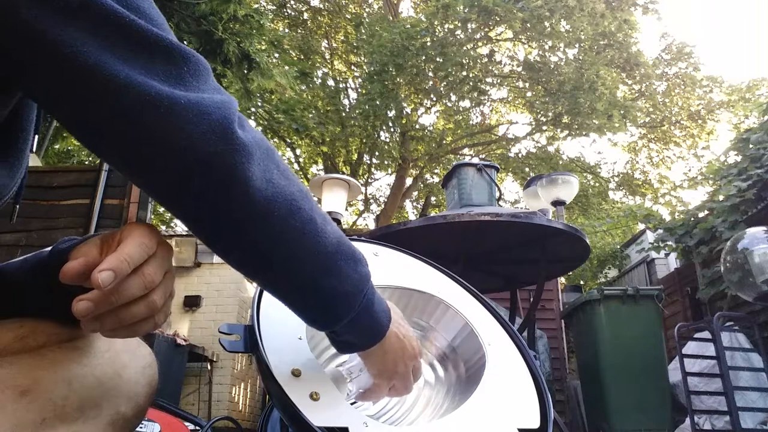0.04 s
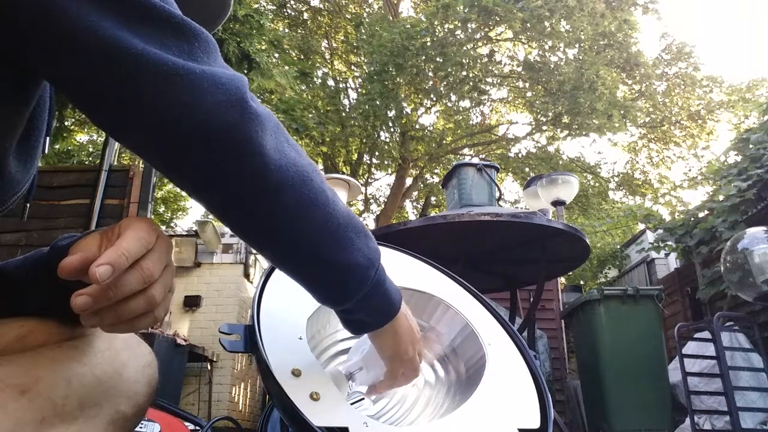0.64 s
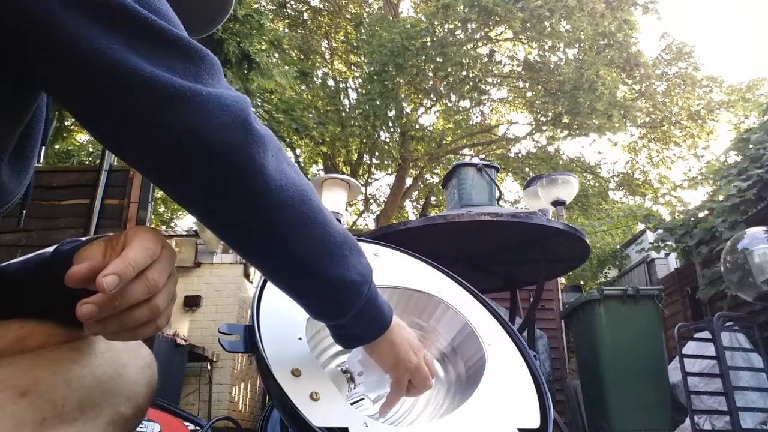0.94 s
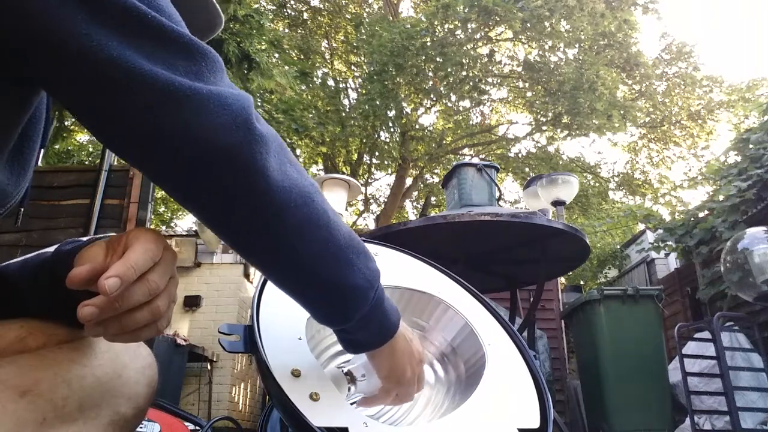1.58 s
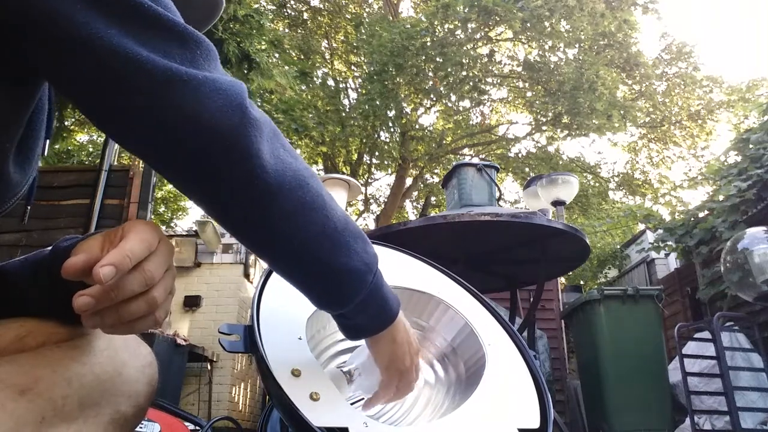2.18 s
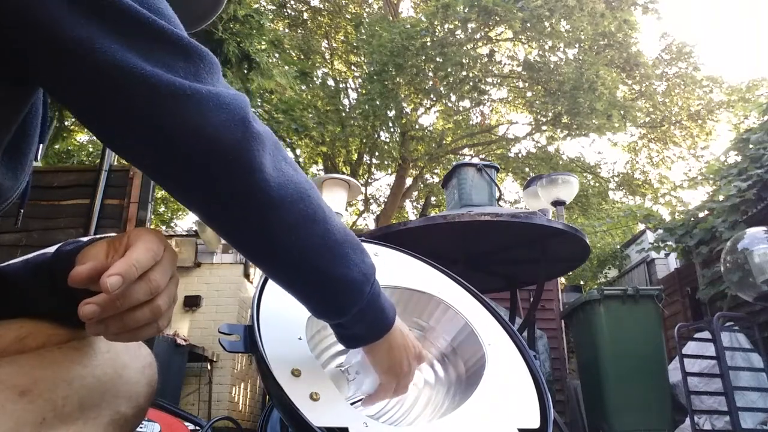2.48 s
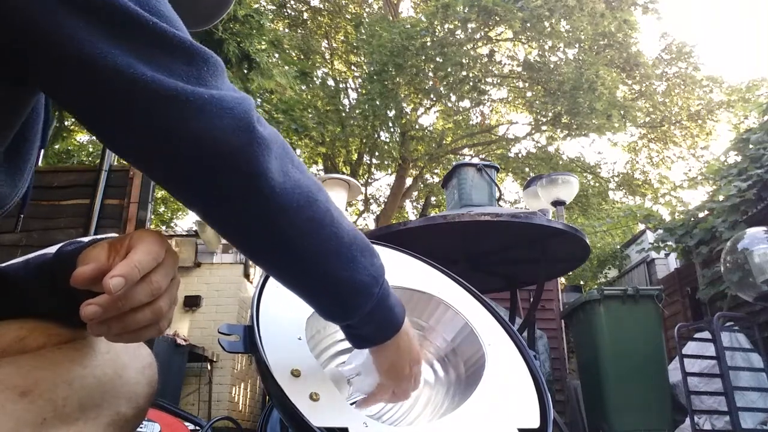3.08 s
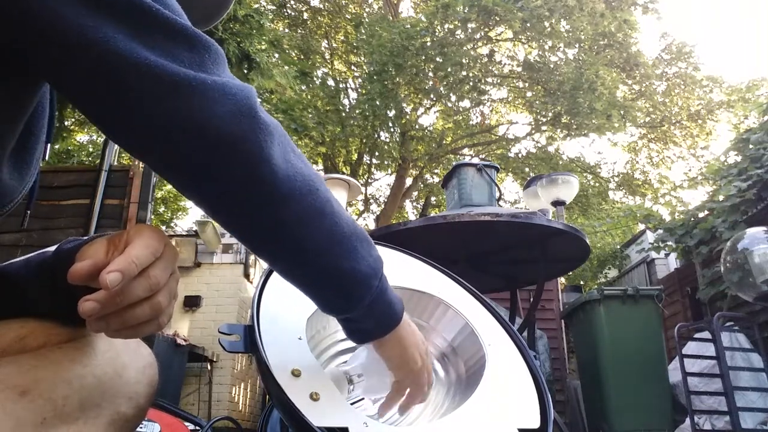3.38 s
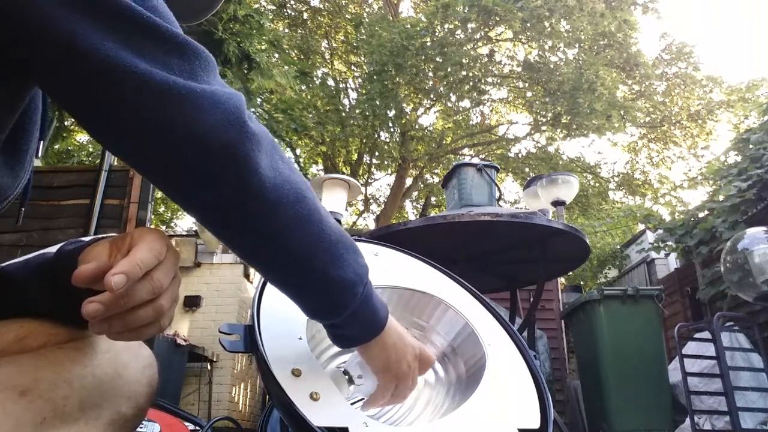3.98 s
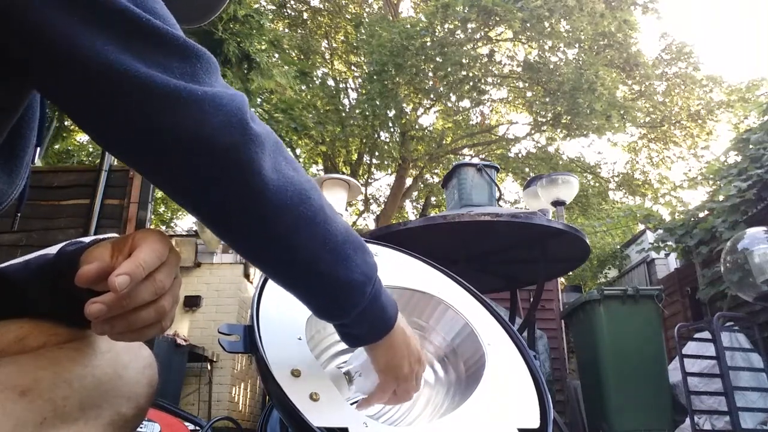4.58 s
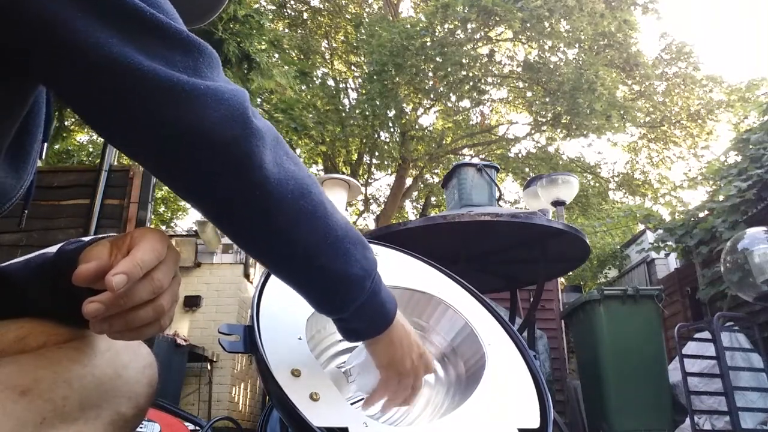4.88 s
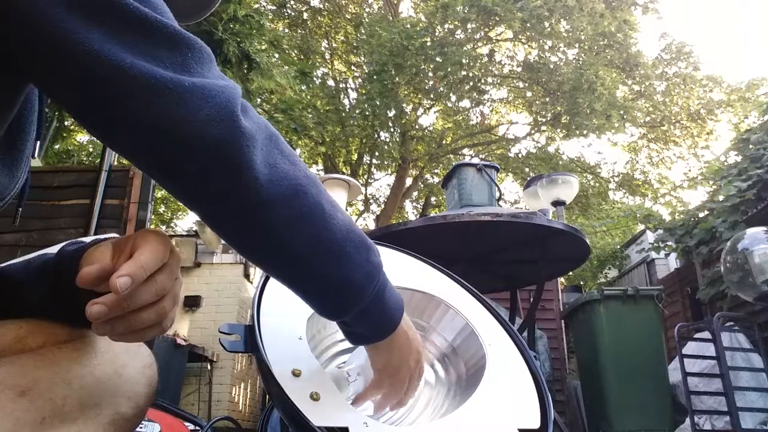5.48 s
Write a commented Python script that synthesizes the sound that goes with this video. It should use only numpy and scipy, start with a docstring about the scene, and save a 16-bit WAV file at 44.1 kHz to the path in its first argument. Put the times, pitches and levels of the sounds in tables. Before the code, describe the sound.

A glass lamp is screwed into a metal floodlight, with irregular clacks, rubbing and small squeaks over a faint outdoor hum.

```python
"""Screwing a lamp into a floodlight

A big glass lamp is turned by hand into a metal holder, in a quiet garden. Its cap rubs and
catches in the thread; each catch clacks in the holder and sets the reflector bowl booming.
Now and then grit makes the glass tick, dry surfaces squeak, and a thin whistle flares up.
Behind it lie a faint hum, distant rumble and microphone hiss."""
import sys
import numpy as np
from scipy import signal
from scipy.fft import rfft, irfft, next_fast_len
from scipy.io import wavfile
from scipy.ndimage import uniform_filter1d

SR = 44100
rng = np.random.default_rng(int(sys.argv[2]) if len(sys.argv) > 2 else 0)


def dump(signal):
    """Clip the signal to [-1, 1] and save it as 16-bit WAV at the path in sys.argv[1]."""
    limited = np.clip(np.atleast_2d(signal).T, -1, 1)
    pcm = np.round(limited * 32767).astype(np.int16)
    wavfile.write(sys.argv[1], SR, pcm)


N = 244073
TIME = np.arange(N) / SR
RING_TIME = TIME[:SR]   # one second for a struck part to ring

# spectrum of the distant rumble: f/Hz, relative level/dB
RUMBLE_SPECTRUM = [(25, -31), (38, -5), (55, -3.5), (100, -0.5), (140, -8), (200, -7), (320, -12.5),
                   (600, -18.5), (1000, -24), (1600, -27), (2300, -34), (5000, -52), (9000, -63)]
# spectrum of the hiss: f/Hz, relative level/dB
HISS_SPECTRUM = [(2000, 5.5), (4000, -5.5), (5500, -6), (8000, 0), (10000, 1.5), (16000, 0.5)]
# slow swells of the hiss: t/s, relative level/dB
HISS_SWELLS = [(0.0, -72.5), (0.75, -73.5), (1.28, -70), (1.6, -72), (3.3, -68), (3.57, -71.5), (4.64, -72),
               (4.79, -70.5), (5.04, -72.5), (5.53, -72.5)]
# steady hum: f/Hz, level/dB
HUM_TONES = [(103, -69.5)]

# A mode is a note that a part rings at; its t60 is the time it takes to fade by 60 dB.
# modes of the holder and reflector: f/Hz, relative level/dB, t60/s
HOLDER_MODES = [(302, -35.5, 0.32), (474, 6, 0.071), (514.4, -12.5, 0.26), (581, -0.5, 0.15),
                (705, 3, 0.067), (767, -7, 0.061), (830, -27, 0.049), (940, 12, 0.05), (1092, 7, 0.034),
                (1171, -3, 0.13), (1339, -4.5, 0.055), (1453, -5.5, 0.11), (1614, -0.5, 0.06),
                (1709, -4, 0.049), (1825, -13.5, 0.14), (1920, -26, 0.12), (2390, 1.5, 0.17),
                (2520, -15, 0.095), (3180, -17, 0.075), (4620, -17, 0.17)]
# low, slowly fading modes of the bowl: f/Hz, relative level/dB, t60/s
BOWL_MODES = [(180.66, 5, 0.41), (207.5, 1, 0.27), (230.4, -22, 1), (265.5, -6.5, 0.25)]
# modes of the glass and cap: f/Hz, relative level/dB, t60/s
GLASS_MODES = [(2700, -1.5, 0.12), (2950, -8.5, 0.078), (3600, -13, 0.074), (4710, -4, 0.054),
               (4900, -19, 0.028), (7700, -4, 0.039), (8680, 0.5, 0.016), (11000, -1.5, 0.08),
               (12600, -36, 0.0077), (13950, 5, 0.0086), (15300, 6.5, 0.014)]
# spectrum of the sheet metal's dense ring: f/Hz, relative level/dB
METAL_SPECTRUM = [(150, -8.5), (330, -2), (600, -2.5), (1000, -3.5), (1700, -13), (2200, -17),
                  (3200, -10.5), (5000, -11.5), (16000, -36)]
# boost of all the bowl's modes but the lowest in a boom: t/s, boost/dB
BOWL_UPPER_BOOST = [(0.4, 4), (1.1, -8.5), (2.3, 4.5), (2.6, 18), (2.9, -0.5), (3.85, -3.5), (4.4, -10.5),
                    (4.85, 2.5)]

# twists of the wrist: start t/s, length/s, relative peak rub/dB, relative peak bowl drone/dB
WRIST_TWISTS = [(-.05, 0.099, -57, -44), (0.297, 0.069, -51, -52), (0.785, 0.17, -55.5, -52),
                (1.008, .11, -52.5, -41), (1.294, .12, -48.5, -45), (1.622, 0.15, -61, -42),
                (1.831, 0.12, -50.5, -39), (2.038, 0.13, -58.5, -46), (2.257, 0.22, -48.5, -41),
                (2.515, 0.16, -52.5, -43), (2.749, 0.083, -47, -45), (2.897, 0.076, -48, -39),
                (3.085, 0.17, -53, -36), (3.316, 0.13, -53.5, -43.5), (3.572, 0.13, -59.5, -46),
                (3.8, 0.15, -49.5, -44), (4.013, 0.13, -58, -44.5), (4.315, 0.098, -48, -47),
                (4.548, 0.1, -49.5, -41.5), (4.769, 0.085, -47.5, -48), (5.206, 0.1, -53.5, -47)]
# thin high chirps of the turning lamp: t/s, half length/s, level/dB
WHISTLE_CHIRPS = [(2.14, .05, -78), (2.36, 0.01, -68), (2.464, 0.014, -67), (2.8, 0.045, -78),
                  (2.96, .026, -73), (4.328, .013, -74), (4.412, .03, -77), (4.86, .055, -80)]
# squeaks of dry thread and fingers on glass: t/s, half length/s, f/Hz, pitch spread/Hz, level/dB
DRY_SQUEAKS = [(0.269, 0.031, 1580, 252, -57), (0.305, 0.045, 1040, 133, -56.5),
               (0.384, .019, 960, 150, -47), (0.95, 0.03, 1660, 300, -64), (1.379, 0.017, 1820, 527, -48),
               (2.908, 0.0063, 1190, 90, -35.5), (2.912, 0.0094, 614, 68.4, -31.5),
               (2.941, 0.0037, 1670, 300, -45.5), (3.081, 0.0071, 2170, 345, -45),
               (3.382, 0.0083, 1632, 70, -40), (3.954, 0.0088, 1190, 248, -49.5),
               (4.015, 0.025, 1540, 67, -56), (4.305, 0.0048, 954, 60.3, -52),
               (4.431, 0.0068, 1550, 260, -53)]
# bright ticks of the glass: t/s, level/dB, f/Hz of the mode struck hardest
GLASS_TICKS = [(2.430, -60, 4900), (2.448, -62, 4900), (2.556, -64.5, 7700), (3.0732, -44, 15300),
               (3.0772, -56, 11000), (4.003, -64, 2700), (4.504, -67, 13950), (4.638, -56, 13950),
               (4.853, -64, 13950), (4.889, -61, 2950), (5.259, -62, 7700)]
# catches in the thread: t/s, clack level/dB, chatter length/s, cap's note f/Hz, relative boom level/dB
THREAD_CATCHES = [ (0.355, -42, 0.006, 1030, -39), (0.527, -54, 0.0059, 980, -63),
                  (0.799, -53.5, .026, 1030, -54), (0.827, -45, 0.01, 910, -43.5),
                  (1.052, -71, .015, 880, -44), (1.105, -46.5, .003, 870, -37),
                  (1.337, -51, 0.013, 1370, -46), (1.358, -38, 0.0095, 1610, -69),
                  (1.372, -41, .007, 447, -33), (1.430, -38.5, 0.018, 1000, -34),
                  (1.699, -47, 0.0072, 770, -40.5), (1.771, -51.5, 0.0069, 930, -51),
                  (1.837, -42, .045, 690, -38.5), (1.902, -39, 0.012, 990, -54),
                  (1.944, -38.5, 0.0096, 618, -42), (2.068, -52.5, 0.012, 890, -44),
                  (2.236, -53, 0.053, 885, -51), (2.288, -51.5, .017, 890, -41.5),
                  (2.428, -30.5, 0.004, 1420, -44.5), (2.431, -32, 0.013, 923, -37),
                  (2.555, -43.5, 0.0019, 1530, -51), (2.588, -39.5, 0.012, 853, -38),
                  (2.690, -50, 0.0016, 820, -51), (2.784, -42, 0.009, 830, -40),
                  (2.903, -30, 0.035, 648, -39.5), (2.931, -35, 0.017, 1010, -34),
                  (3.075, -21.5, 0.019, 931, -27), (3.078, -27.5, 0.0061, 705, -51),
                  (3.348, -50, 0.02, 920, -42), (3.376, -45, 0.0028, 1400, -62),
                  (3.463, -49.5, 0.0043, 1090, -50), (3.802, -48.5, 0.025, 830, -39.5),
                  (3.861, -46.5, 0.0099, 914, -52), (3.931, -44.5, 0.0063, 950, -40),
                  (4.256, -52.5, 0.0052, 870, -45.5), (4.367, -49, .045, 1500, -45.5),
                  (4.389, -37.5, 0.023, 830, -69), (4.504, -50.5, 0.0055, 1630, -55),
                  (4.555, -45.5, 0.031, 737, -41), (4.639, -41, 0.029, 1576, -70),
                  (4.790, -66, 0.0074, 870, -39.5), (4.828, -43, 0.025, 1064, -43),
                  (4.852, -37.5, 0.0032, 755, -51), (5.111, -55, 0.0067, 900, -43.5),
                  (5.253, -41, 0.007, 680, -59), (5.270, -41.5, .006, 1130, -48.5)]


def from_db(db):
    """Turn decibels into a factor to multiply by."""
    return 10 ** (np.asarray(db) / 20)


def rms_one(x):
    """Scale a sound so that its average strength (rms) is 1."""
    return x / np.sqrt(np.mean(x ** 2) + 1e-20)


def loudest_one(x, size):
    """Scale a sound so that its loudest stretch of `size` samples has rms 1."""
    return x / np.sqrt(uniform_filter1d(x ** 2, size).max() + 1e-20)


def evened(x, size):
    """Hold the rms near 1, ironing out swells longer than `size` samples."""
    return x / np.sqrt(uniform_filter1d(x ** 2, size) + 1e-20)


def add(out, at_s, sound):
    """Mix a sound in at the given time."""
    start = int(np.clip(at_s * SR, 0, N - 1))
    out[start:start + len(sound)] += sound[:N - start]


def high_pass(x, hz, order):
    """Turn down what lies below hz; a higher order cuts more steeply."""
    return signal.sosfilt(signal.butter(order, hz, "high", fs=SR, output="sos"), x)


def coloured(x, spectrum):
    """Give a noise a smooth spectrum, at rms 1."""
    hz, db = np.transpose(spectrum)
    size = next_fast_len(len(x))
    bin_hz = np.maximum(np.arange(size // 2 + 1) * SR / size, 1)
    gain = from_db(np.interp(np.log(bin_hz), np.log(hz), db))
    return rms_one(irfft(rfft(x, size) * gain, size)[:len(x)])


def resonance(x, hz, width_hz):
    """Let a band around hz through and weaken the rest."""
    r = np.exp(-np.pi * width_hz / SR)
    feedback = [1, -2 * r * np.cos(2 * np.pi * hz / SR), r * r]
    return signal.lfilter(np.array([1, 0, -1]) * (1 - r * r) / 2, feedback, x)


def ringing(modes):
    """One fading sine wave per mode, each in its own row."""
    return np.array([from_db(db - 60 * RING_TIME / t60) * np.sin(2 * np.pi * hz * RING_TIME)
                     for hz, db, t60 in modes])


def slips(size, per_s, spread_db):
    """Tiny slips at random moments, uneven in strength and direction."""
    happens = rng.random(size) < per_s / SR
    strength = from_db(spread_db * np.clip(rng.standard_normal(size), -2, 2))
    return happens * strength * rng.choice([-1, 1], size)


def muffled(x, edge_hz=1980, leak_db=-24):
    """Fingers pressing on the lamp soften the contact; only a trace of treble gets out."""
    soft = signal.sosfilt(signal.butter(14, edge_hz, fs=SR, output="sos"), x)
    return soft + from_db(leak_db) * resonance(x, hz=2700, width_hz=1500)


def friction(grip_s=0.029, build_db=6, let_go_db_per_s=148):
    """Each twist takes hold, builds until the wrist runs out, then fades: rub and drone gains."""
    rub, drone = from_db(-66), from_db(-57.5)   # the hand resting on the lamp
    for start, length, rub_db, drone_db in WRIST_TWISTS:
        t = TIME - start
        building_db = build_db * (np.clip(t / length, 0, 1) - 1)
        fading_db = let_go_db_per_s * np.maximum(t - length, 0)
        grip = np.clip(t / grip_s, 0, 1) * from_db(building_db - fading_db)
        rub = np.hypot(rub, from_db(rub_db) * grip)
        drone = np.hypot(drone, from_db(drone_db) * grip)
    return rub, drone


def background(rumble_db=-55.5, hiss_boost_db=3.5):
    """Distant rumble, a hiss that swells a little and a faint hum."""
    rumble = from_db(rumble_db) * coloured(rng.standard_normal(N), RUMBLE_SPECTRUM)
    hiss_db = np.interp(TIME, *np.transpose(HISS_SWELLS)) + hiss_boost_db
    hiss = from_db(hiss_db) * coloured(rng.standard_normal(N), HISS_SPECTRUM)
    hum = sum(from_db(db) * np.sqrt(2) * np.sin(2 * np.pi * hz * TIME) for hz, db in HUM_TONES)
    return rumble + hiss + hum


def whistle(hz=8860, width_hz=200, follow_db=-33):
    """A thin, high whistle faintly follows the friction and flares up in chirps."""
    note = resonance(resonance(rng.standard_normal(N), hz, width_hz), hz, width_hz)
    chirps = sum(from_db(db) * np.exp(-.5 * ((TIME - at_s) / half_length) ** 2)
                 for at_s, half_length, db in WHISTLE_CHIRPS)
    rub_gain, _ = friction()
    return np.hypot(chirps, from_db(follow_db) * rub_gain) * evened(note, size=400)


def squeaks(muffle_below_hz=2000):
    """Dry surfaces stick and slip briefly: a narrow pitch spread sings, a wide one rasps."""
    out = np.zeros(N)
    t = RING_TIME[:SR // 2] - 1 / 4   # zero in the middle of the squeak
    for at_s, half_length, hz, spread_hz, db in DRY_SQUEAKS:
        note = rng.standard_normal(len(t))
        for _ in range(3):
            note = resonance(note, hz, 2 * spread_hz)
        note = evened(note, size=200)
        if hz < muffle_below_hz:   # low rasps sound through the holder and lose their treble
            note = rms_one(muffled(note))
        swell = np.exp(-.5 * (t / half_length) ** 2)
        add(out, at_s + t[0], from_db(db) * swell * note)
    return out


def ticks(favour_db=6, falloff_db=6, snap_db=-3, snap_hz=8000, grit_s=0.0042):
    """Grit cracks between cap and holder with a dry snap and rings the glass."""
    out, t = np.zeros(N), RING_TIME[:SR // 8]
    modes = ringing(GLASS_MODES)[:, :len(t)]
    mode_hz = np.array(GLASS_MODES)[:, 0]
    for at_s, db, hz in GLASS_TICKS:
        pitch_gap = abs(np.log(mode_hz / hz))
        nearest = pitch_gap == pitch_gap.min()
        ring = from_db(favour_db * nearest - falloff_db * pitch_gap) @ modes
        crack = rng.standard_normal(len(t)) * np.exp(-t / grit_s)
        glass = loudest_one(signal.fftconvolve(crack, ring)[:len(t)], size=150)
        snap = loudest_one(high_pass(crack, snap_hz, order=3), size=150)
        tick = glass + from_db(snap_db) * snap
        add(out, at_s, from_db(db) * loudest_one(tick, size=150))
    return out


def rubbing(rub_trim_db=-2, drone_trim_db=-3.5):
    """The thread grinds in fine slips that keep the holder ringing and the bowl droning."""
    rub_gain, drone_gain = friction()
    grind = slips(N, per_s=900, spread_db=6)
    ring = rng.choice([-1, 1], len(HOLDER_MODES)) @ ringing(HOLDER_MODES)
    holder = rms_one(signal.fftconvolve(grind, ring)[:N])
    rub = rms_one(muffled(holder + coloured(grind, METAL_SPECTRUM)))
    bowl = ringing(BOWL_MODES).sum(axis=0)
    drone = signal.fftconvolve(rng.standard_normal(N + SR), bowl)[SR:SR + N]
    drone = evened(drone, size=3500)   # the quick wobble stays; the slow swell follows the hand
    return rub_gain * from_db(rub_trim_db) * rub + drone_gain * from_db(drone_trim_db) * drone


def booms(swell_s=0.0079, vary_db=1, trim_db=-1):
    """Each jolt spreads from the holder into the bowl, whose close modes swell late and wobble."""
    out, modes = np.zeros(N), ringing(BOWL_MODES)
    swell = 1 - np.exp(-(RING_TIME / swell_s) ** 2)
    is_upper = np.arange(len(modes)) > 0
    for at_s, *_, boom_db in THREAD_CATCHES:
        boost_db = np.interp(at_s, *np.transpose(BOWL_UPPER_BOOST))
        strengths = from_db(boost_db * is_upper + rng.normal(0, vary_db, len(modes)))
        boom = swell * (strengths @ modes)
        add(out, at_s, from_db(boom_db + trim_db) * loudest_one(boom, size=600))
    return high_pass(out, hz=150, order=3)   # the open bowl gives off little below its lowest mode


def clacks(vary_db=0.5, crack_t60=0.062, tail_db=-15, tail_t60=0.37, cap_t60=0.019):
    """Each catch is a blow and a fading chatter of slips that ring the holder and its sheet metal."""
    out, t = np.zeros(N), RING_TIME[:SR // 2]
    modes = ringing(HOLDER_MODES)[:, :len(t)]
    metal_fade = from_db(-60 * t / crack_t60) + from_db(tail_db - 60 * t / tail_t60)
    for at_s, db, chatter_s, cap_hz, _ in THREAD_CATCHES:
        chatter = slips(len(t), per_s=1200, spread_db=2.0) * np.exp(-t / chatter_s)
        force = chatter / (np.linalg.norm(chatter) + 1e-9)
        force[0] += 1   # the blow
        strengths = from_db(rng.normal(0, vary_db, len(modes))) * rng.choice([-1, 1], len(modes))
        holder = loudest_one(strengths @ modes, size=220)
        metal = coloured(rng.standard_normal(len(t)), METAL_SPECTRUM) * metal_fade
        struck = loudest_one(signal.fftconvolve(force, holder + metal)[:len(t)], size=180)
        # the cap springs against the holder with a short note of its own
        cap = t * from_db(-60 * t / cap_t60) * np.sin(2 * np.pi * cap_hz * t)
        cap_db = -3 + 0.54 * (db + 37)   # stands out more the harder the catch; -37 dB is a firm catch
        clack = muffled(struck + from_db(cap_db) * loudest_one(cap, size=180))
        add(out, at_s, from_db(db) * loudest_one(clack, size=180))
    return high_pass(out, hz=120, order=2)   # the small holder gives off little bass


def scene():
    """All the sounds together in one channel, an arm's length from the floodlight."""
    return (clacks() + booms() + rubbing() + ticks() + squeaks() + whistle() + background())[None]


def record(dry, bass_hz=48, top_hz=15950):
    """The microphone drops the deepest bass; the highest treble is cut steeply."""
    thin = high_pass(dry, bass_hz, order=4)
    return signal.sosfilt(signal.ellip(12, .1, 80, top_hz, fs=SR, output="sos"), thin)


dry = scene()
out = record(dry)
dump(out)
```